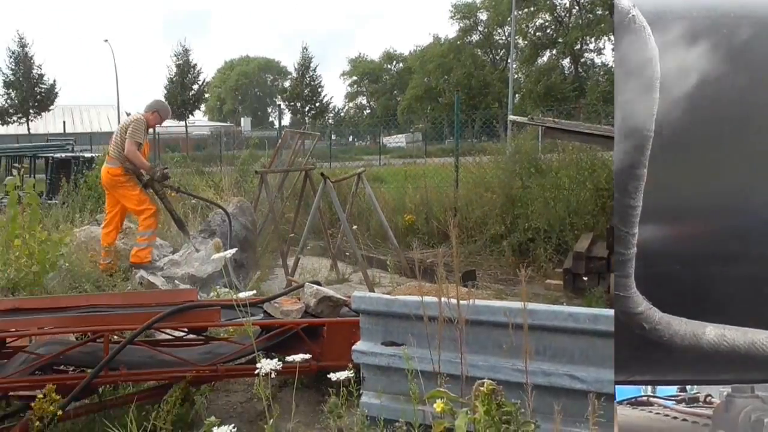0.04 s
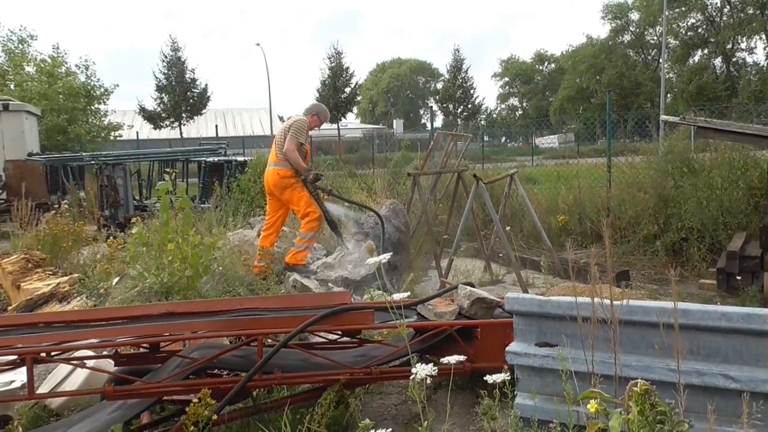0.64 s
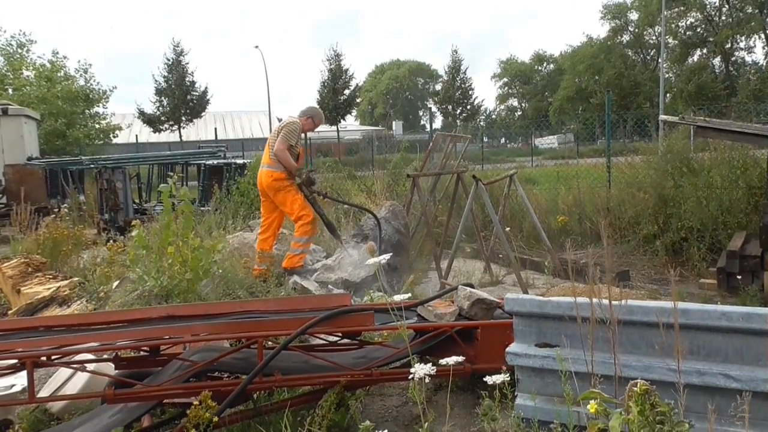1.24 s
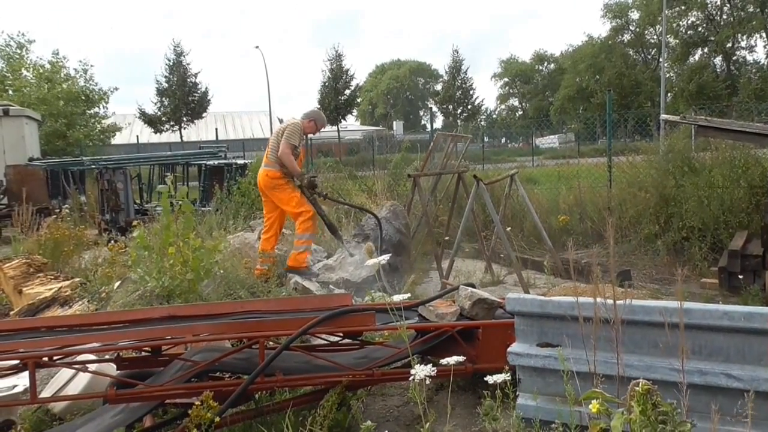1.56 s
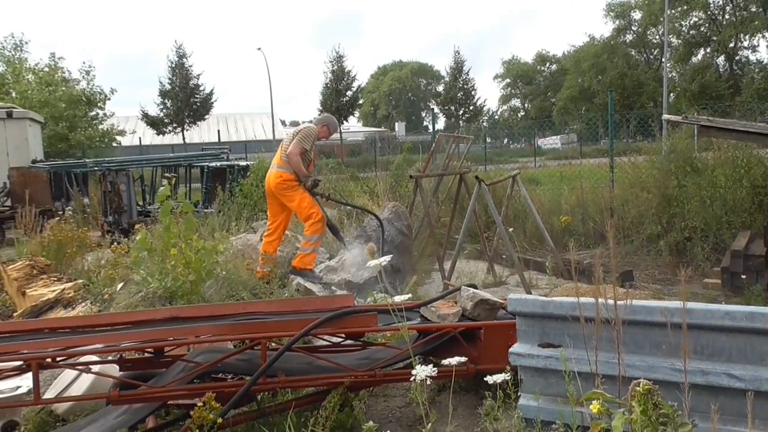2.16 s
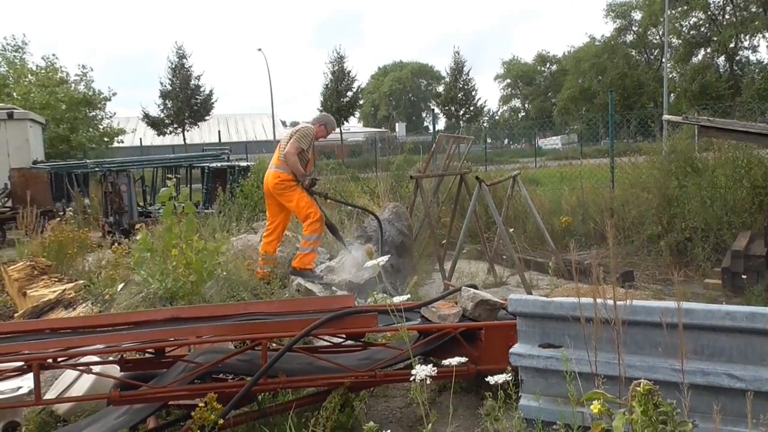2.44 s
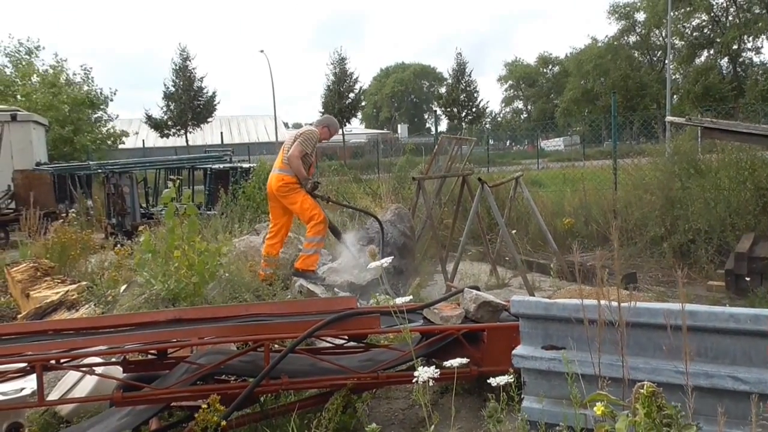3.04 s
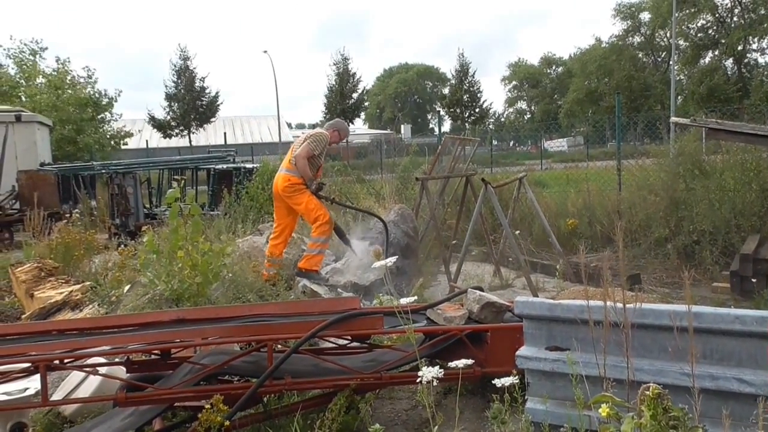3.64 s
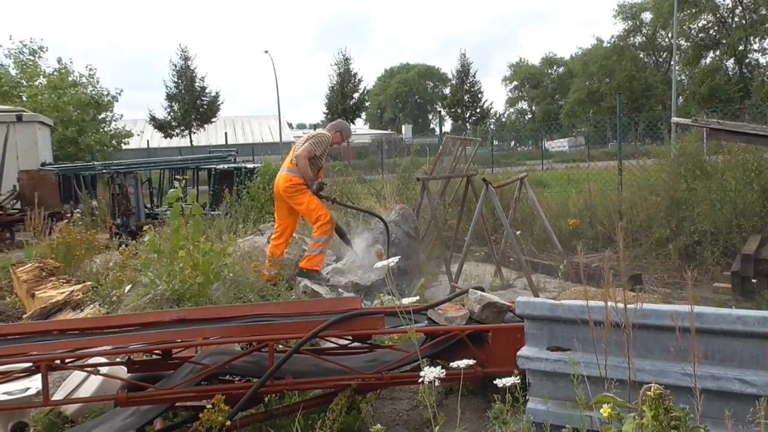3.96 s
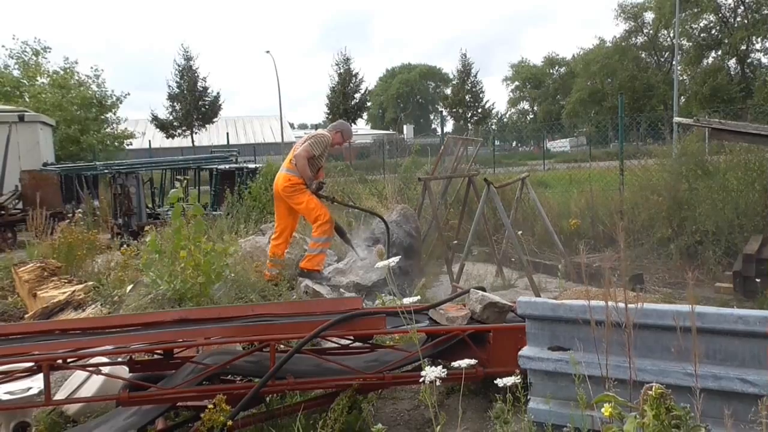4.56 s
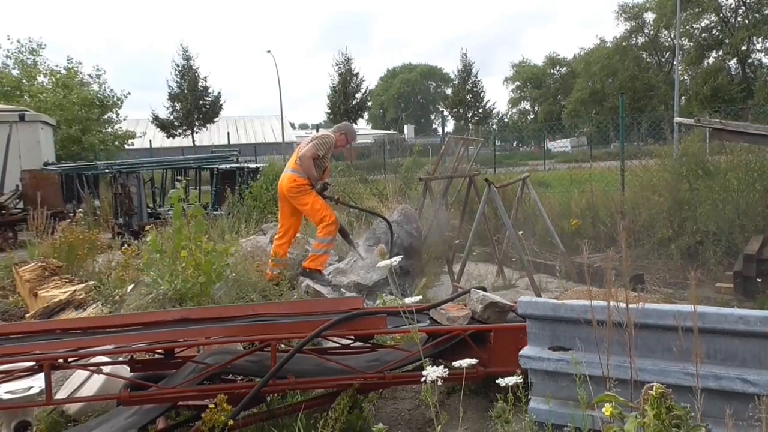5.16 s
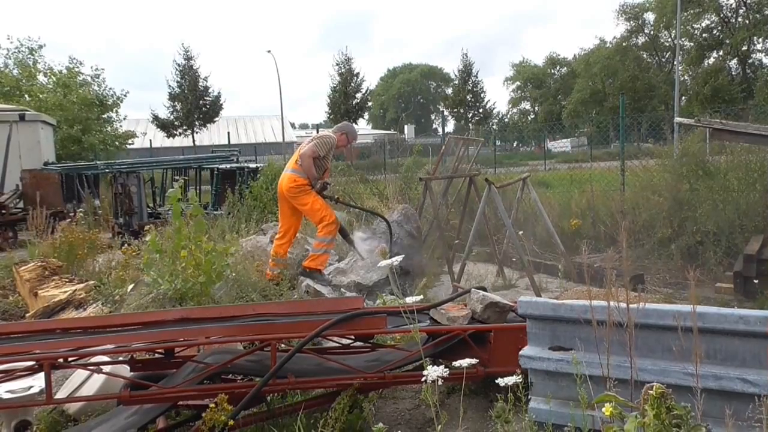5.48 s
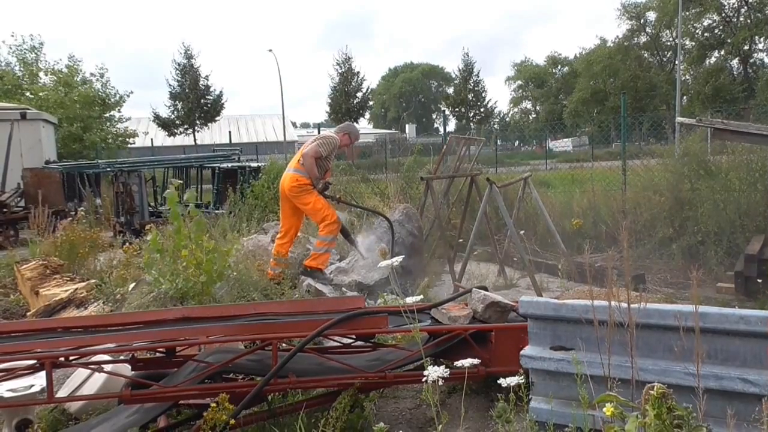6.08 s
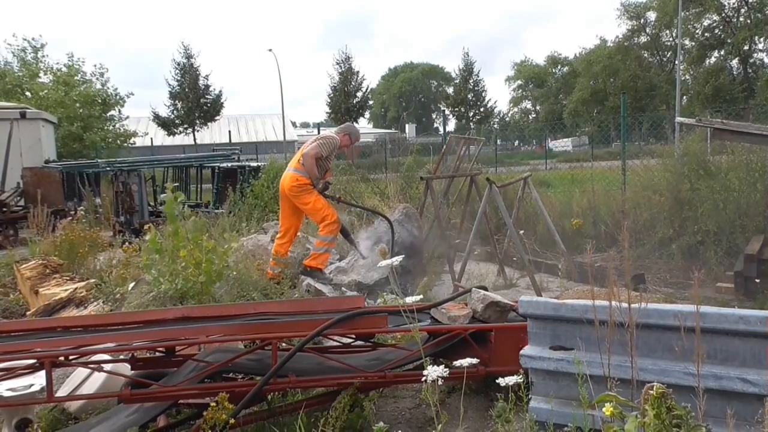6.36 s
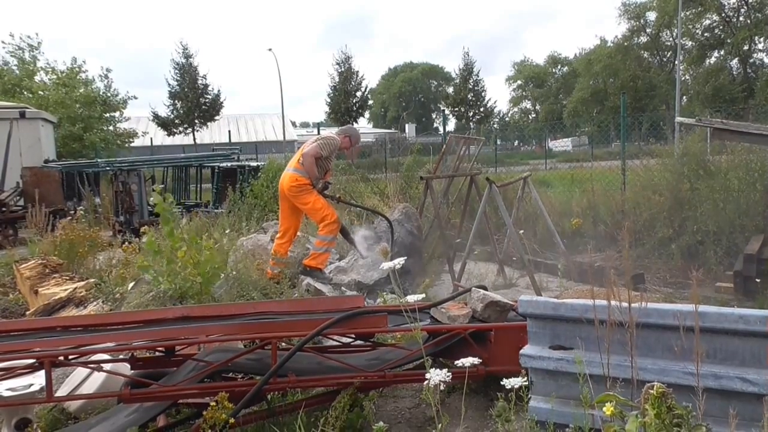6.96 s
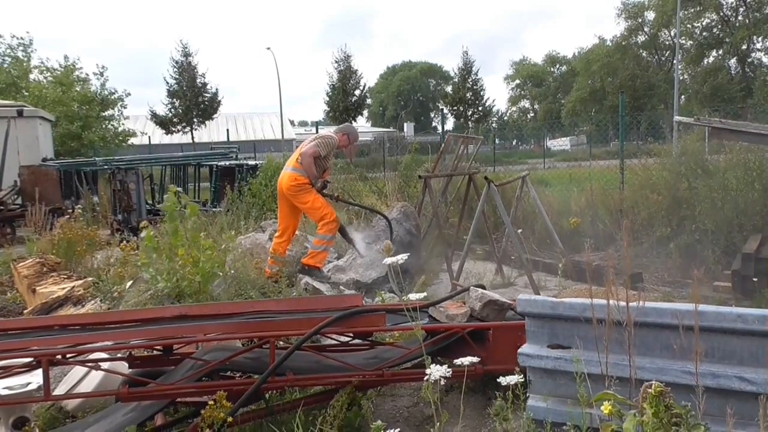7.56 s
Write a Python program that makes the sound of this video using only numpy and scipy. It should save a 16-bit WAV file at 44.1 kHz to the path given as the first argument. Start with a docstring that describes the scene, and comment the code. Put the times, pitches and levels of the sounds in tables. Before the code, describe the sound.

A pneumatic jackhammer pounds concrete outdoors in three bursts, with spitting air, a ringing steel chisel and brief pauses.

```python
"""An open yard full of scrap steel: some metres away, a pneumatic jackhammer breaks concrete in 3 bursts.
Each stroke lets out a pressure pulse and an air jet, cracks the concrete and may leave the chisel ringing;
a weaker puff marks the piston's return. Before the first two bursts, air rushes in and the valve flutters.
Ground and scrap echo the pulses. A compressor drones far off, in a light breeze."""
import sys
import numpy as np
from scipy import signal
from scipy.fft import rfft, irfft, next_fast_len
from scipy.io import wavfile

SR = 44100
rng = np.random.default_rng(int(sys.argv[2]) if len(sys.argv) > 2 else 0)


def write(x):
    x = np.atleast_2d(x).T
    wavfile.write(sys.argv[1], SR, np.round(np.clip(x, -1, 1) * 32767).astype(np.int16))


N = 344862

# Noise spectra. Each row: frequency in Hz, relative density in dB.
COMPRESSOR_SPECTRUM = [(41, -39), (70, 7.5), (213, 7), (268, -3), (321, 3), (451, -6.5), (494, -7.5),
                       (695, -4), (1760, -20), (6160, -13), (10900, -9.5), (13300, -17), (16000, -34)]
BREEZE_SPECTRUM = [(20, -9), (50, -5), (100, 0), (300, -26.5), (1000, -60)]
YARD_SPECTRUM = [(40, -25), (100, 1), (150, 18), (190, 4), (230, -9), (300, 7.5), (400, 7.5), (600, -12),
                 (1000, 11.5), (3000, -5.5)]
RUSH_SPECTRUM = [(30, -32), (70, -2.5), (130, -3), (210, 3.5), (300, -4.5), (450, -32), (1000, -28)]
HOWL_SPECTRUM = [(250, -3), (380, 7), (520, 4.5), (650, 5), (800, -1.5), (1400, -4.5), (1900, -21),
                 (4000, -53)]
LEAK_SPECTRUM = [(1060, -51), (1800, -8), (2390, -5), (2720, -14), (3030, -8), (3910, -5.5), (4020, -3.5),
                 (5340, -6), (7840, -2), (10800, 6.5), (16000, -19)]
JET_SPECTRUM = [(500, -4), (1500, -10.5), (2700, -29), (4000, -10.5), (5200, -10), (6200, -14),
                (7300, -2.5), (9500, 1.5), (12000, -1), (14000, -11.5), (16000, -78)]
CRACK_SPECTRUM = [(90, -37), (200, 9.5), (400, -16), (620, 8.5), (880, -9), (1020, 2), (1400, -0.5),
                  (1750, -7), (2050, -3.5), (2700, -6), (3700, 0.5), (5000, -4.5), (6200, -13.5),
                  (9000, -8)]
# Echoes off the scrap. Each row: delay in seconds, signed relative gain.
SCRAP_ECHOES = [(.00533, 0.13), (.00964, 0.099), (.01204, 0.088), (.01259, -0.096), (.01626, 0.055),
                (.01887, -0.076), (.0204, 0.14), (.0212, 0.17), (.03315, -0.095), (.03757, -0.033)]
# Air feeding the tool, two spells. Each row: time in seconds, flow in dB, leak hiss in dB.
FEED_SPELLS = [
    [(0.0, -36, -34.5), (.16, -37, -34), (.24, -29.5, -35), (.36, -35, -34.5), (.44, -41.5, -32.5),
     (.6, -49, -39.5), (1.31, -43.5, -38.5), (1.42, -48, -42.5), (1.57, -45, -53)],
    [(1.62, -64, -58), (1.78, -67, -53), (1.82, -40.5, -47), (1.88, -40, -50), (1.92, -35, -28.5)],
]
# Air passage resonances. Each row: frequency in Hz, relative level in dB.
PASSAGE_MODES = [(212, -6), (448, 6), (695, -1)]
# Air let out with no blow. Each row: start in seconds, peak in dB, relative thump in dB, decay in seconds.
IDLE_PUFFS = [(0.4637, -16, -19, 0.019), (0.5086, -17.5, -31, 0.0071), (1.9496, -15, -40, 0.0066),
              (5.2284, -16, -19.5, 0.0076), (5.2614, -23.5, -28, 0.0062)]
# The loose chisel knocks on concrete. Each row: start in seconds, relative level in dB.
CHISEL_KNOCKS = [(0.0266, -26), (0.0663, -26.5), (1.385, -20), (1.483, -32), (1.5445, -23.5),
                 (5.1123, -36.5), (5.1273, -31)]
# The tool is set down or shifted. Each row: start in seconds, relative level in dB.
TOOL_THUDS = [(0.083, -14.5), (1.375, -27)]
# Valve flutter. Each row: start and length in seconds, first and last pitch in Hz, tone and air in dB.
VALVE_FLUTTERS = [(0.47, 0.0243, 477, 238, -21.5, -20.5), (1.9153, 0.0239, 332, 237, -23.5, -22.5)]
# Steel modes. Each row: frequency in Hz, T60 in seconds, relative level in dB.
HOUSING_MODES = [(1047, 0.13, -3), (1917, 0.041, -2), (2460, 0.044, -5.5), (3705, 0.0215, -24),
                 (4400, 0.0214, -28), (8030, .025, -14), (13500, .03, -9)]
CHISEL_MODES = [(6752, 0.14, 15.5), (9250, 0.041, 16.5), (5170, 0.093, 14.5), (4770, 0.036, 23),
                (11000, 0.059, 24), (12200, 0.1, 20)]
# The chisel rides loose. Each row: start and end in seconds, drive of its first mode in dB.
LOOSE_SPELLS = [(.63, .87, -39.5), (1.06, 1.32, -42), (2.28, 2.48, -44), (2.61, 3.06, -44),
                (3.08, 3.18, -36.5), (3.64, 3.79, -35.5), (3.8, 4.28, -43.5), (4.79, 5.0, -43),
                (5.38, 5.64, -44), (6.14, 6.24, -42), (6.36, 6.57, -38.5), (7.01, 7.17, -41),
                (7.56, 7.82, -39.5)]
# The chisel jumps clear. Each row: time in seconds, drive of its second mode in dB.
CHISEL_PINGS = [(.586, -19), (.696, -26), (.908, -32), (1.129, -24), (1.301, -28), (2.135, -26),
                (2.296, -34), (2.803, -32), (2.921, -29), (3.038, -28), (3.39, -32), (3.711, -33),
                (4.804, -25.5), (4.863, -28), (5.289, -34), (5.398, -25.5), (5.508, -30), (5.947, -31.5),
                (6.162, -25), (6.216, -27), (6.435, -28), (6.82, -27), (7.801, -28)]
# Loosened concrete rings dully. Each row: start in seconds, peak in dB, frequency in Hz.
SLAB_RINGS = [(1.3004, -24, 1430), (2.6815, -27, 1420), (2.743, -33, 1420), (2.8024, -35, 1420),
              (2.922, -25, 1400), (2.9861, -24, 1430), (3.0398, -23, 1420), (3.0974, -37, 1420),
              (4.431, -29, 3440), (4.484, -32, 3470)]
# Exhaust port swings, of opposite sign. Each row: frequency in Hz, decay in seconds, relative level in dB.
PORT_SWINGS = [(603, 0.00091, 15.5), (357, 0.00047, 19.5)]
# Hammer pace. Each row: start in seconds, strokes per second (0: one last stroke).
STROKE_PACE = [(0.5283, 17.67), (0.6415, 18.72), (1.0154, 17.54), (1.3005, 0.0), (1.9692, 17.24),
               (2.0272, 18.6), (2.296, 18.17), (2.6812, 15.97), (2.7438, 17.01), (3.0966, 15.89),
               (3.2225, 17.96), (3.3895, 18.63), (3.7653, 17.92), (4.156, 18.54), (4.8031, 16.87),
               (4.9809, 0.0), (5.2887, 18.24), (6.0013, 18.76), (6.1612, 18.23), (6.8196, 18.48),
               (7.2525, 18.94), (7.4109, 17.76), (7.6925, 18.48), (7.8007, 0.0)]

REFILL_S = .4   # a longer pause fills the cylinder


def from_db(db):
    """Decibels to gain."""
    return 10 ** (np.asarray(db) / 20)


def pan(db):
    """Stereo gains: left up by db, right down."""
    return from_db([[db], [-db]])


def noise(spectrum, side_db):
    """Coloured stereo noise: mid at rms 1, side at side_db."""
    hz, db = np.transpose(spectrum)
    size = next_fast_len(N)
    bins_hz = np.maximum(np.fft.rfftfreq(size, 1 / SR), 1)
    gain = from_db(np.interp(np.log(bins_hz), np.log(hz), db)) * np.minimum(bins_hz / hz[0], 1) ** 2
    pair = irfft(rfft(rng.standard_normal((2, size))) * gain, size)[:, :N]
    mid, side = pair / np.sqrt(np.mean(pair ** 2, axis=1, keepdims=True))
    return mid + from_db(side_db) * side * np.array([[1], [-1]])


def clicks(times_s, heights):
    """One-sample impulses."""
    out = np.zeros(N)
    np.add.at(out, np.clip(np.round(np.atleast_1d(times_s) * SR).astype(int), 0, N - 1), heights)
    return out


def swell(times_s, db, rise_s, fall_s):
    """Envelope of bursts summed in power, each peaking at its dB."""
    t = np.arange(SR // 2) / SR
    shape = (1 - np.exp(-t / rise_s)) * np.exp(-t / fall_s)
    power = signal.oaconvolve(clicks(times_s, from_db(db) ** 2), (shape / shape.max()) ** 2)[:N]
    return np.sqrt(np.maximum(power, 0))


def ring(x, hz, t60_s):
    """Resonator: a unit click starts a decaying unit sine."""
    radius, angle = from_db(-60 / (t60_s * SR)), 2 * np.pi * hz / SR
    return signal.lfilter([0, np.sin(angle)], [1, -2 * radius * np.cos(angle), radius ** 2], x + 1e-18)


def struck(modes, times_s, db):
    """Each blow excites each mode with its own random strength."""
    chance_db = rng.normal(0, 2.5, (len(times_s), len(modes)))
    return sum(ring(clicks(times_s, from_db(db + mode_db + chance_db[:, k])), hz, t60_s)
               for k, (hz, t60_s, mode_db) in enumerate(modes))


def delayed(x, delay_s):
    """Fractional delay."""
    return np.interp(np.arange(N) - delay_s * SR, np.arange(N), x, left=0)


def add(out, start_s, piece):
    """Mix a piece in at start_s."""
    span = out[round(start_s * SR):][:len(piece)]
    span += piece[:len(span)]


def compressor_and_breeze(drone_db=-45.5, breeze_db=-56.5):
    """A far compressor drones; light wind rumbles."""
    drone = from_db(drone_db) * noise(COMPRESSOR_SPECTRUM, side_db=-6.5)
    return drone + from_db(breeze_db) * noise(BREEZE_SPECTRUM, side_db=-8)


def yard(x, t60_s=0.27, tail_db=-17.5, build_s=0.033):
    """Adds scrap echoes from alternate sides and a thin, low tail from sheds and trees."""
    t = np.arange(SR // 2) / SR
    tail = noise(YARD_SPECTRUM, side_db=-29)[:, :len(t)]
    tail *= from_db(-60 * t / t60_s) * (1 - np.exp(-t / build_s))
    tail *= from_db(tail_db) / np.sqrt(np.sum(tail ** 2) / 2)
    echoes = sum(gain * delayed(x, s) * pan(3 * (-1) ** k) for k, (s, gain) in enumerate(SCRAP_ECHOES))
    return x + echoes + signal.oaconvolve(x[None], tail, axes=1)[:, :N]


def air_feed(waver_hz=14, full_flow_db=-29):
    """Air filling hose and tool rushes, howls, whistles in the passages and hisses from a leak."""
    gains, t = np.zeros((2, N)), np.arange(N) / SR
    for spell in FEED_SPELLS:
        times_s, *levels_db = np.transpose(spell)
        edges_s = np.r_[times_s[0] - .02, times_s, times_s[-1] + .05]
        gains += [np.interp(t, edges_s, np.r_[0, from_db(db), 0]) for db in levels_db]
    flow, leak = gains
    whistle_gain = from_db(full_flow_db - 3.5) * (flow / from_db(full_flow_db)) ** 2
    tones, knots_s = np.zeros(N), t[::SR // 100]
    for hz, db in PASSAGE_MODES:
        pitch_hz = hz + waver_hz * np.interp(t, knots_s, rng.standard_normal(len(knots_s)))
        tones += from_db(db) * np.sin(2 * np.pi * np.cumsum(pitch_hz) / SR)
    rush = from_db(-3.5) * noise(RUSH_SPECTRUM, side_db=-15)
    howl = from_db(-1.5) * noise(HOWL_SPECTRUM, side_db=-8)
    return flow * (rush + howl) + leak * noise(LEAK_SPECTRUM, side_db=-7.5) + whistle_gain * tones


def idle_puffs():
    """Air escapes with no blow: a spurt and a low thump."""
    spurts = sum(swell(s, db, rise_s=.0006, fall_s=decay_s) for s, db, _, decay_s in IDLE_PUFFS)
    times_s, _, thump_db, _ = np.transpose(IDLE_PUFFS)
    thumps = swell(times_s, thump_db - 4, rise_s=0.0029, fall_s=0.011)
    return spurts * noise(JET_SPECTRUM, side_db=-14) + thumps * noise(RUSH_SPECTRUM, side_db=-20)


def chisel_knocks():
    """The loose chisel taps the concrete: a crunch and a steel ring."""
    times_s, db = np.transpose(CHISEL_KNOCKS)
    crunch = noise(JET_SPECTRUM, side_db=-6.5) + from_db(-4.5) * noise(CRACK_SPECTRUM, side_db=-23)
    crunch *= swell(times_s, db - 3.5, rise_s=0.00037, fall_s=0.0089)
    return crunch + struck(CHISEL_MODES, times_s, db - 28)


def tool_thuds():
    """The heavy tool thuds as it is set down or shifted."""
    times_s, db = np.transpose(TOOL_THUDS)
    return swell(times_s, db - 5.5, rise_s=0.0014, fall_s=0.012) * noise(RUSH_SPECTRUM, side_db=-14)


def valve_flutter():
    """The valve chops the first air into a falling rasp; returns tone and hiss."""
    tone, air = np.zeros(N), np.zeros(N)
    for start_s, length_s, first_hz, last_hz, tone_db, air_db in VALVE_FLUTTERS:
        progress = np.linspace(0, 1, round(length_s * SR))
        phase = 2 * np.pi * np.cumsum(last_hz + (first_hz - last_hz) * (1 - progress) ** 2) / SR
        gate = signal.windows.tukey(len(progress), .2)
        rasp = np.sin(phase) + 0.94 * np.sin(2 * phase) + 0.25 * np.sin(3 * phase)
        add(tone, start_s, from_db(tone_db) * gate * rasp)
        add(air, start_s, from_db(air_db) * gate * (1 + 0.625 * np.sin(phase)))
    hiss = noise(JET_SPECTRUM, side_db=-15) + from_db(-10.5) * noise(CRACK_SPECTRUM, side_db=-32)
    return tone, air * hiss


def valve_ticks(times_s, tick_hz=3900):
    """The valve snaps over just before each blow."""
    chance_db = rng.normal(0, 2, len(times_s))
    ticks = swell(times_s - 0.00186, chance_db - 33.5, rise_s=0.00031, fall_s=0.0015)
    ticks += swell(times_s - .0075, chance_db - 40, rise_s=.0005, fall_s=0.0041)
    spectrum = [(tick_hz / 2, -18), (tick_hz, 0), (tick_hz * 1.47, -14), (tick_hz * 4, -22)]
    return ticks * noise(spectrum, side_db=-16)


def chisel_drives_db(times_s, seated_db=-52.5, ping_rest_db=-48, low_rest_db=-53.5):
    """Drive of the first three modes per blow: weak when seated, strong when loose or jumping."""
    sing_db, ping_db, low_db = rng.normal(0, 3, (len(times_s), 3)).T
    sing_db += seated_db
    for start_s, end_s, db in LOOSE_SPELLS:
        sing_db[(times_s > start_s) & (times_s < end_s)] += db - seated_db
    ping_db += ping_rest_db
    for s, db in CHISEL_PINGS:
        ping_db[np.argmin(np.abs(times_s - s))] = db
    low_db += low_rest_db + 0.26 * (ping_db - ping_rest_db)
    return sing_db, ping_db, low_db


def chisel_rings(times_s, drives_db, rebound_s=.008, swell_t60_s=0.0093, detune=.002, split=.004):
    """On rebound three modes swell and sing, each split into two bending planes that beat."""
    free_s = times_s + rebound_s + .0033 * rng.uniform(-1, 1, len(times_s))
    out, t = np.zeros(N), np.arange(SR // 5) / SR
    for levels_db, (hz, t60_s, mode_db) in zip(drives_db, CHISEL_MODES):
        envelope = from_db(mode_db - 60 * t / t60_s) - from_db(mode_db - 60 * t / swell_t60_s)
        pitches_hz = hz * rng.normal(1, detune, len(times_s))
        offsets_rad = rng.uniform(0, 2 * np.pi, len(times_s))
        for s, db, pitch_hz, offset_rad in zip(free_s, levels_db, pitches_hz, offsets_rad):
            phase = 2 * np.pi * pitch_hz * t
            pair = np.sin(phase) + .5 * np.sin(phase * (1 + split) + offset_rad)
            add(out, s, from_db(db - 1.5) * envelope * pair)
    return out


def concrete(times_s, db):
    """Blows crush concrete with a dry crack; grit trickles after; at times a loose piece rings."""
    blow_db = db + rng.normal(0, 1.37, len(times_s))
    crack = swell(times_s, blow_db - 10, rise_s=0.006, fall_s=0.0061) * noise(CRACK_SPECTRUM, -46)
    grit = swell(times_s, blow_db - 20.5, rise_s=0.014, fall_s=0.024) * noise(CRACK_SPECTRUM, -28)
    slabs = sum(ring(clicks(s, from_db(peak_db)), hz, t60_s=0.048) for s, peak_db, hz in SLAB_RINGS)
    return crack + grit + slabs


def air_jets(times_s, db, return_share=0.519):
    """A spit of air per stroke, its scatter off the scrap, and a soft puff as the piston turns back."""
    periods_s = np.diff(times_s)
    running = periods_s < 2 * np.median(periods_s)
    turns_s = (times_s[:-1] + periods_s * return_share)[running]
    turn_db = db[:-1][running] + rng.normal(0, 1.8, len(turns_s))
    spit = swell(times_s, db + 4.5, rise_s=0.00036, fall_s=0.0028) * noise(JET_SPECTRUM, -11.5)
    scatter = swell(times_s + 0.0029, db - 1.5, rise_s=0.00066, fall_s=0.0072) * noise(JET_SPECTRUM, -8)
    puff = swell(turns_s, turn_db - 10.5, rise_s=0.0034, fall_s=0.0035) * noise(JET_SPECTRUM, -12)
    far = swell(times_s, db - 20.5, rise_s=0.0068, fall_s=0.042) * noise(JET_SPECTRUM, 4.5)
    return spit + scatter + puff + far


def exhaust_pulses(times_s, levels_db, low_cut_hz=234, full_low_cut_hz=90, ground_delay_s=0.0012442):
    """Each stroke dumps a slug of air, deeper from a full cylinder; the ground reflects it."""
    out, t = np.zeros(N), np.arange(SR // 50) / SR
    full = np.diff(times_s, prepend=0) > REFILL_S
    stretches = np.where(full, 1.01, 1) * np.exp(rng.normal(0, 0.018, len(times_s)))
    cuts_hz = np.where(full, full_low_cut_hz, low_cut_hz)
    for s, db, stretch, cut_hz in zip(times_s, levels_db, stretches, cuts_hz):
        age_s, pressure = t / stretch, np.zeros(len(t))
        for k, (hz, decay_s, swing_db) in enumerate(PORT_SWINGS):
            envelope = from_db(swing_db) * age_s / decay_s * np.exp(-age_s / decay_s)
            pressure += (-1) ** k * envelope * np.sin(2 * np.pi * hz * age_s)
        low_cut = signal.butter(2, cut_hz, "high", fs=SR, output="sos")
        add(out, s, from_db(db) * stretch * signal.sosfilt(low_cut, pressure))
    return out + delayed(out, ground_delay_s)


def stroke_times_s():
    """A whole number of evenly spaced strokes per stretch of steady pace."""
    ends_s = [s for s, _ in STROKE_PACE[1:]] + [N / SR]
    stretches = []
    for (start_s, pace_hz), end_s in zip(STROKE_PACE, ends_s):
        count = max(round((end_s - start_s) * pace_hz), 1)
        stretches.append(start_s + np.arange(count) / max(pace_hz, 1))
    return np.concatenate(stretches)


def stroke_drives_db(times_s, full_boost_db=2.8, sag_db_per_s=0.6):
    """A full cylinder boosts the pulse; the jet fades as hose pressure sags through a burst."""
    pauses_s = np.diff(times_s, prepend=0)
    burst_start_s = np.maximum.accumulate(np.where(pauses_s > 2 * np.median(pauses_s), times_s, 0))
    pulse_chance, jet_chance = rng.standard_normal((len(times_s), 2)).T
    pulse_db = -17.5 + full_boost_db * (pauses_s > REFILL_S) + .5 * pulse_chance
    jet_db = -19 - sag_db_per_s * (times_s - burst_start_s) + .7 * jet_chance
    return pulse_db, jet_db


def scene():
    """The hammer and its handling, over compressor and breeze."""
    times_s = stroke_times_s()
    pulse_db, jet_db = stroke_drives_db(times_s)
    flutter_tone, flutter_hiss = valve_flutter()
    pulses = yard(exhaust_pulses(times_s, pulse_db) + flutter_tone) * pan(.8)
    blows = valve_ticks(times_s) + concrete(times_s, pulse_db)
    housing = struck(HOUSING_MODES, times_s + 0.002884, jet_db - 15.5)
    rings = chisel_rings(times_s, chisel_drives_db(times_s)) * pan(1)
    air = air_jets(times_s + 0.0008, jet_db) * pan(-.6) + flutter_hiss + air_feed()
    handling = idle_puffs() + chisel_knocks() + tool_thuds()
    return compressor_and_breeze() + handling + air + rings + housing + blows + pulses


def record(dry, low_cut_hz=55, high_cut_hz=15500, lag_samples=0.27):
    """Slight right-channel lag, bass cut, clip at full scale, top cut."""
    allpass = (1 - lag_samples) / (1 + lag_samples)
    stereo = np.stack([dry[0], signal.lfilter([allpass, 1], [1, allpass], dry[1])])
    stereo = signal.sosfilt(signal.butter(1, low_cut_hz, "high", fs=SR, output="sos"), stereo)
    high_cut = signal.ellip(10, .1, 80, high_cut_hz, fs=SR, output="sos")
    return signal.sosfilt(high_cut, np.clip(stereo, -1, 1))


dry = scene()
out = record(dry)
write(out)
```